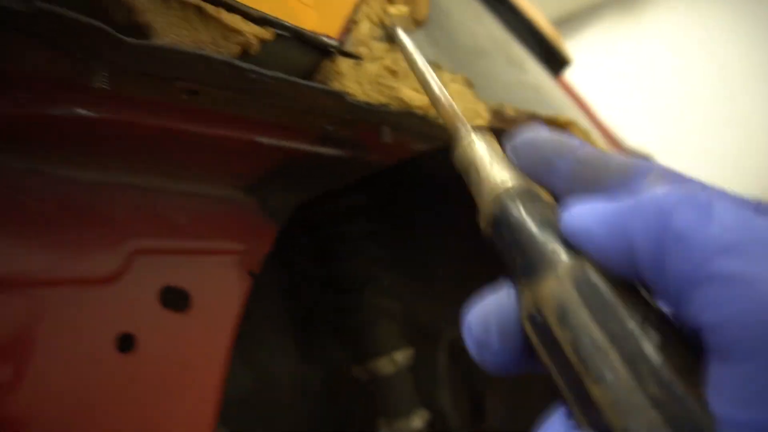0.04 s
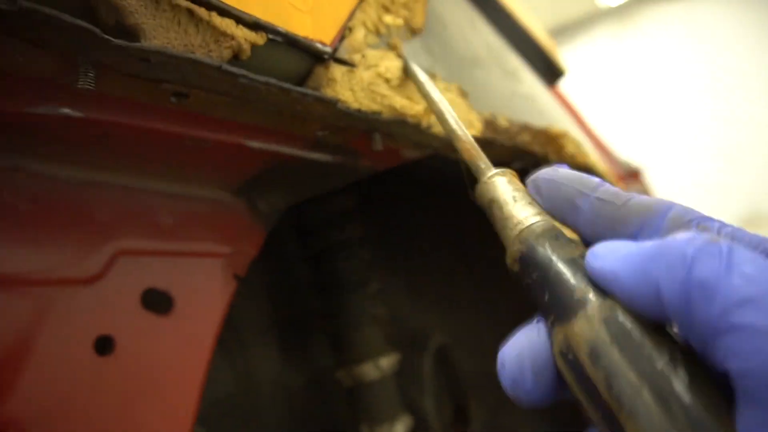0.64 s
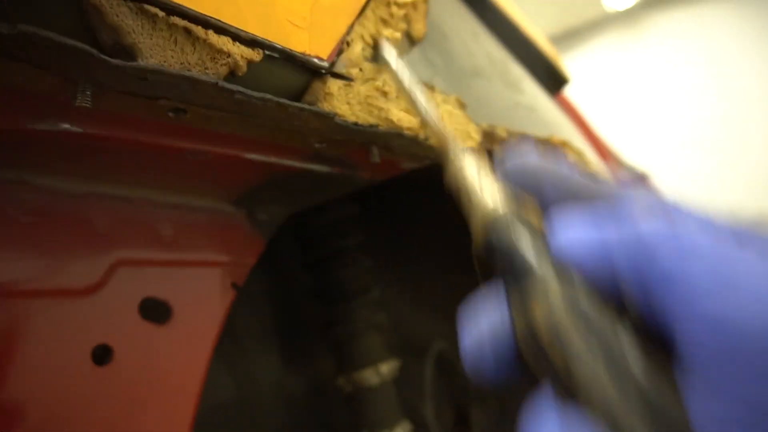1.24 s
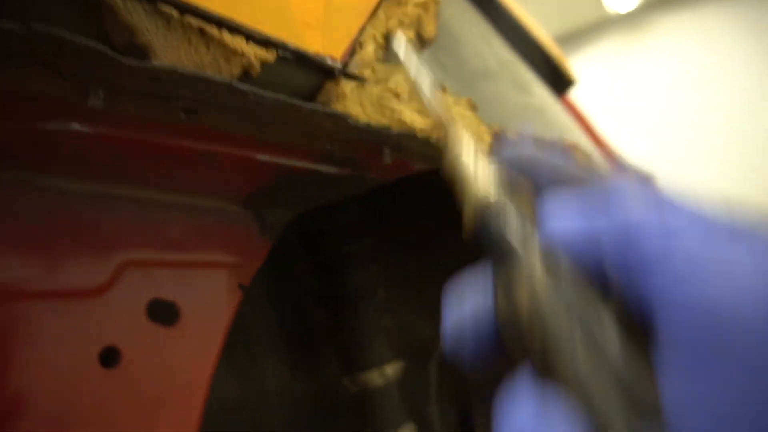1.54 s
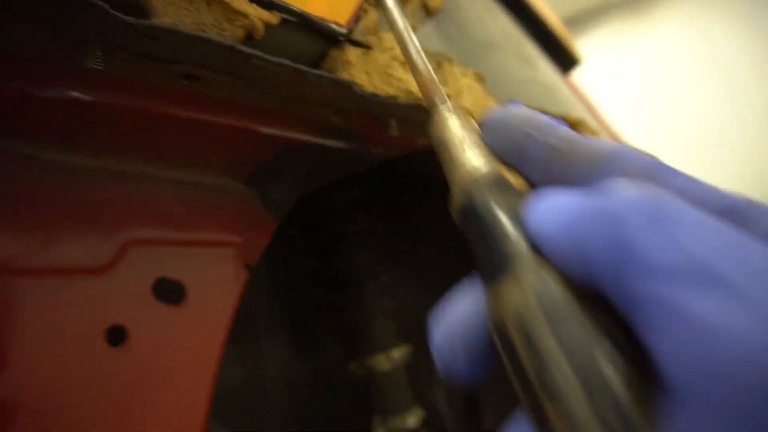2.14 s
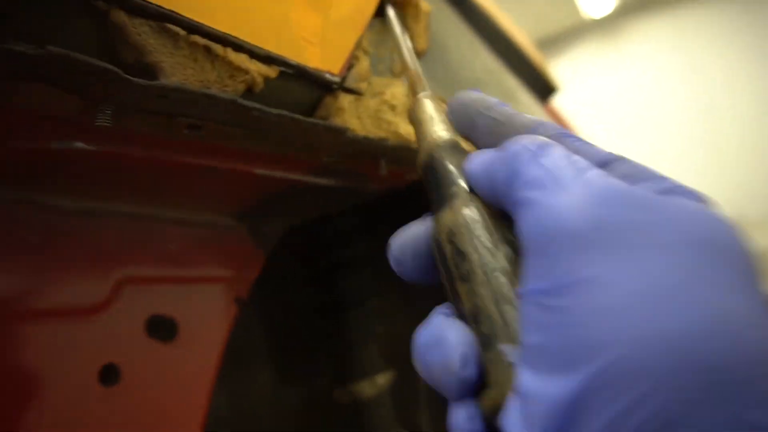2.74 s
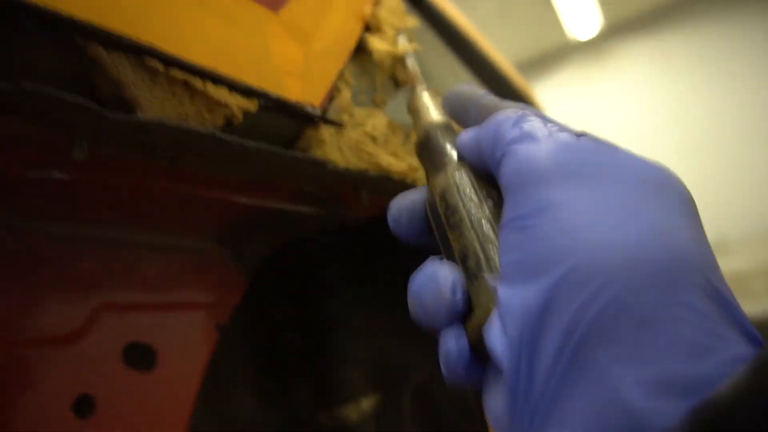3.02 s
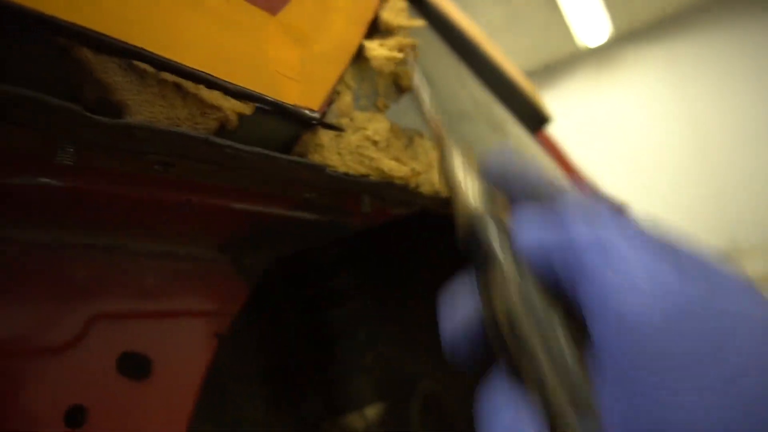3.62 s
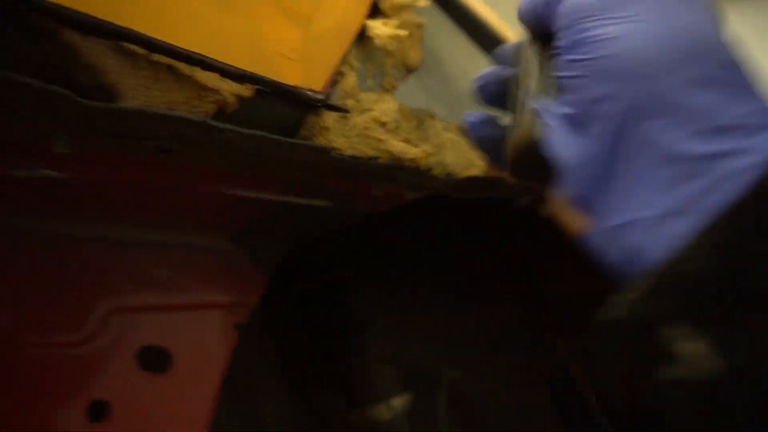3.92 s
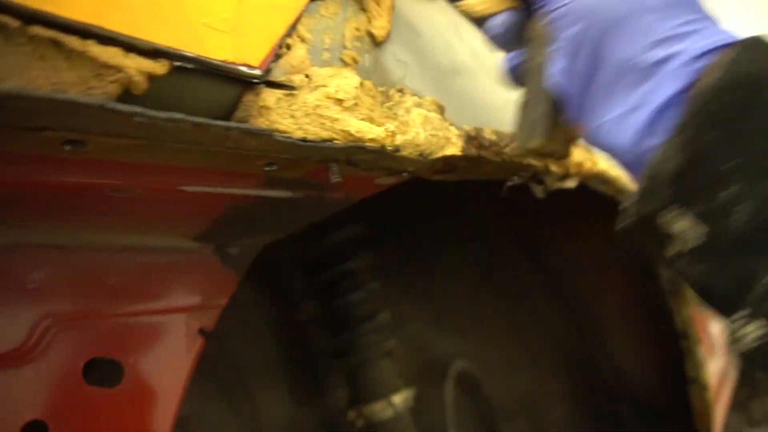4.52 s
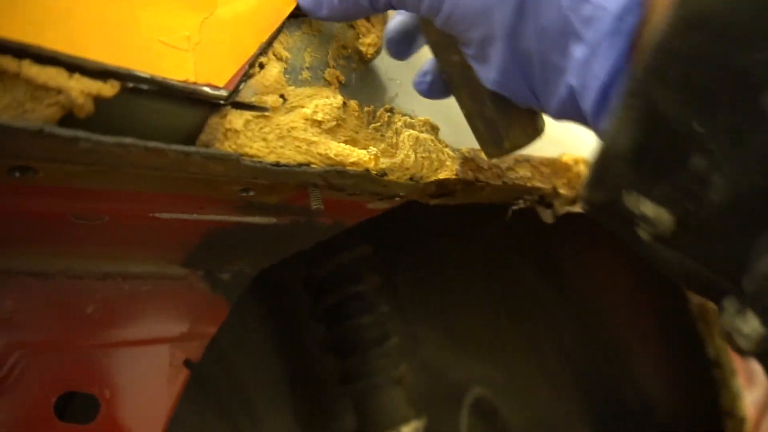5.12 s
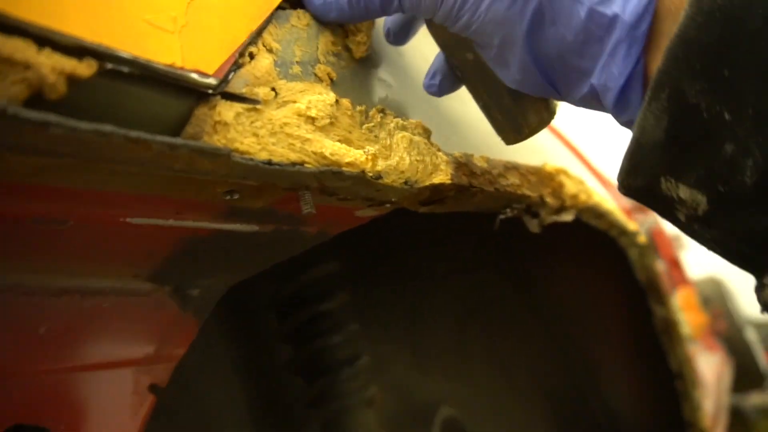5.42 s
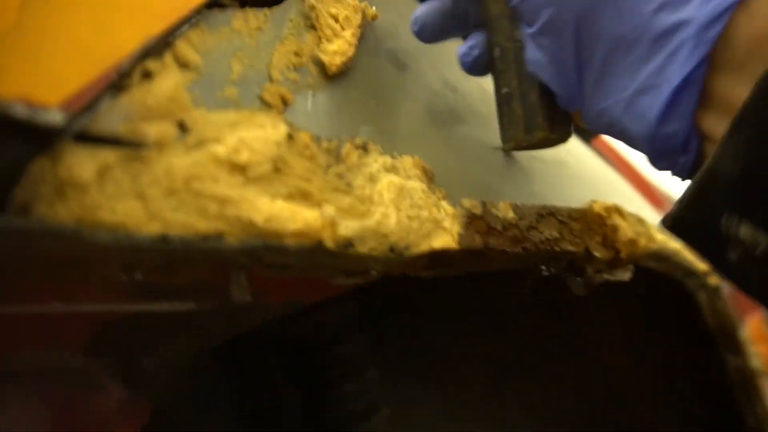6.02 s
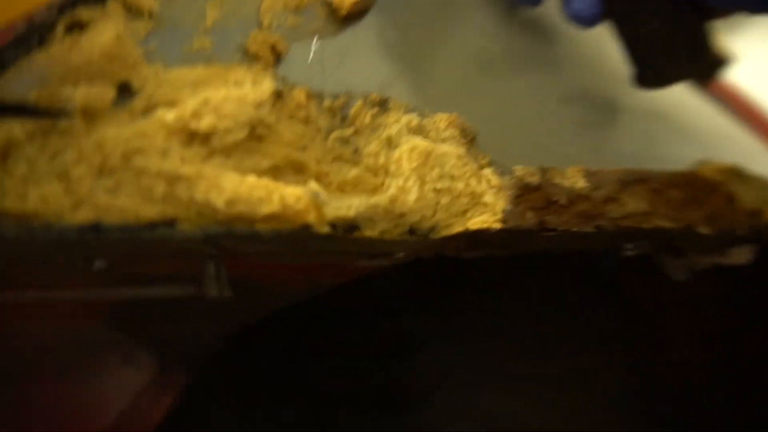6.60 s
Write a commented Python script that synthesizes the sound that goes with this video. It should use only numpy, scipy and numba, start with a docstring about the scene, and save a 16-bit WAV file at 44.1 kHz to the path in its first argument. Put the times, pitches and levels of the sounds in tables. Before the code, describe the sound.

Quick, gritty scrapes of a screwdriver on brittle insulation set a metal car panel drumming, with sharp little cracks and a few thin squeaks on bare metal. A little past halfway the strokes give way to soft, scattered rubbing, glove crinkles and blunt bumps on the panel. The sound is close, with a faint garage echo and low handling rumble on the microphone.

```python
"""Scraping insulation off a car body.

A screwdriver scrapes crumbly insulation off sheet metal, close to a hand-held camera in a garage.
The blade sticks and slips: the panel drums, the blade rasps, crumbs crackle, and now and then the tip
snaps free or squeals on bare metal. Then a gloved hand picks off loose pieces, with a few dull knocks.
The moving camera rumbles throughout."""
import sys
import numpy as np
from scipy import signal
from scipy.fft import rfft, irfft
from scipy.io import wavfile
from scipy.ndimage import uniform_filter1d, map_coordinates
from numba import njit

SR = 44100
rng = np.random.default_rng(int(sys.argv[2]) if len(sys.argv) > 2 else 0)


def write(x):
    x = np.atleast_2d(x).T
    wavfile.write(sys.argv[1], SR, np.round(np.clip(x, -1, 1) * 32767).astype(np.int16))


N = 298116
TIME = np.arange(N) / SR


def undb(db):
    """Decibels to gain."""
    return 10 ** (np.asarray(db) / 20)


def unit(x):
    """Scale to rms 1."""
    return x / np.sqrt(np.mean(x ** 2))


def steady(x, span_s):
    """Hold the rms near 1 over span_s, keeping the finer grain."""
    size = max(int(span_s * SR), 8)
    power = uniform_filter1d(uniform_filter1d(x ** 2, size), size)
    return x / np.sqrt(np.abs(power) + 1e-6 * np.mean(x ** 2))


def band(x, lo_hz, hi_hz, order=3):
    """Butterworth band-pass."""
    return signal.sosfilt(signal.butter(order, [lo_hz, hi_hz], "band", fs=SR, output="sos"), x)


def ring(x, response):
    """Play x through an impulse response."""
    return signal.fftconvolve(x, response)[:len(x)]


def colour(x, spectrum, size=2048):
    """Minimum-phase filter from rows of freq_hz, gain_db."""
    hz, db = np.transpose(spectrum)
    bins_hz = np.fft.rfftfreq(size, 1 / SR)
    log_gain = np.log(undb(np.interp(np.log(bins_hz + 1), np.log(hz), db)))
    cepstrum = irfft(log_gain)
    cepstrum[1:size // 2] *= 2
    cepstrum[size // 2 + 1:] = 0
    return ring(x, irfft(np.exp(rfft(cepstrum))))


@njit
def resonance(x, hz, damping):
    """State-variable band-pass with a moving centre."""
    out, band_state, low_state = np.empty(len(x)), 0., 0.
    for i in range(len(x)):
        g = np.tan(np.pi * hz[i] / SR)
        passed = (band_state + g * (x[i] - low_state)) / (1 + g * (g + damping))
        band_state = 2 * passed - band_state
        low_state += 2 * g * passed
        out[i] = damping * passed
    return out


def wander(per_s):
    """Smooth random drift, spread near 1."""
    size = int(SR / per_s)
    held = np.repeat(rng.standard_normal(N // size + 1), size)[:N]
    return 1.37 * uniform_filter1d(uniform_filter1d(held, size), size)


def delayed(x, lag_s):
    """Read x through a moving delay."""
    return map_coordinates(x, [np.arange(N) - lag_s * SR], order=3, mode="reflect")


def taps(start_s, level_db):
    """One impulse per event."""
    out = np.zeros(N)
    np.add.at(out, (start_s * SR).astype(int), undb(level_db))
    return out


def fractures(per_s, spread_db):
    """Tiny breaks at random moments, most small, a few large."""
    size = undb(spread_db * np.minimum(rng.exponential(size=N), 4))
    return (rng.random(N) < per_s / SR) * size * rng.choice([-1, 1], N)


def spray(breaks, t60_s):
    """Each break scatters a short burst of dust: decaying noise."""
    fade = np.exp(-2 * np.log(1000) * TIME[:SR // 4] / t60_s)
    power = ring(breaks ** 2, fade / fade.sum())
    return np.sqrt(np.abs(power)) * rng.standard_normal(N)


def crunch(per_s, low_hz, high_hz, q, spread_db):
    """Brittle bits, each ringing briefly at its own pitch."""
    out, t = np.zeros(N + 2048), TIME[:2048]
    for when, pitch, chance in rng.random((int(per_s * N / SR), 3)):
        hz = low_hz * (high_hz / low_hz) ** pitch
        size = undb(-spread_db * np.log(max(chance, .03)))
        out[int(when * N):][:len(t)] += size * np.sin(2 * np.pi * hz * t) * np.exp(-np.pi * hz * t / q)
    return unit(out[:N])


def contacts(timing, levels_db, lead_db, swell_db, release_db_per_s, linger_db, fade_db_per_s):
    """Gain of a run of contacts: each leads in, follows the pressure, releases and lingers faintly."""
    power = np.zeros(N)
    for (start, rise, fall), db in zip(timing, levels_db):
        span = slice(max(int(start * SR) - SR // 10, 0), int(start * SR) + SR)
        t = TIME[span] - start
        slack = np.interp(t, [0, rise, rise + fall], [1, 0, 1])
        early, past_peak, released = np.maximum([-t, t - rise, t - rise - fall], 0)
        pressed = undb(-lead_db * early / rise - swell_db * slack ** 2 - release_db_per_s * released)
        lingering = undb(linger_db - fade_db_per_s * past_peak) * np.clip(t / rise, 0, 1)
        power[span] += (undb(db) * np.maximum(pressed, lingering)) ** 2
    return np.sqrt(power)


# camera movement: time_s, level_db
CAMERA_MOVES = [(0.0, -15), (0.19, -29), (0.24, -13), (0.34, -32), (0.58, -25.5), (1.39, -31), (1.51, -33),
                (1.56, -31), (2.26, -18), (3.18, -33.5), (3.88, -26), (3.95, -32), (4.99, -40.5),
                (5.82, -26), (6.06, -17.5), (6.25, -31), (6.7, -19), (6.76, -28)]
# handling noise: freq_hz, gain_db
RUMBLE_SPECTRUM = [(5, -10), (14, 4.5), (25, -4), (45, -16.5), (70, -23), (100, -28.5), (140, -25.5),
                   (250, -49), (600, -91.5)]


def camera_rumble():
    """The camera rumbles as it moves in the hand."""
    time_s, level_db = np.transpose(CAMERA_MOVES)
    noise = colour(rng.standard_normal(N), RUMBLE_SPECTRUM, size=16384)
    rumble = steady(band(noise, 6.1, 600, order=2), span_s=0.12)
    return undb(np.interp(TIME, time_s, level_db)) * rumble


# room tone: freq_hz, gain_db
AIR_SPECTRUM = [(60, 2), (130, 0), (300, -5), (600, -10), (1100, -15), (2500, -20), (6400, -24),
                (10000, -27), (16000, -32)]


def garage_air():
    """Still air: steady, dark noise."""
    return unit(colour(rng.standard_normal(N), AIR_SPECTRUM))


# sheet-metal modes: freq_hz, level_db, t60_s
PANEL_MODES = [(116.7, -13.5, 0.16), (160.8, -8, 0.38), (188.5, -9, 0.46), (246.7, 5, 0.19),
               (261, 0.5, 0.36), (283.35, 4, 0.35), (324.5, -8.5, 0.3), (365.2, -8.5, 0.25),
               (438, -17, 0.11), (497, -36, 0.055), (593, -10.5, 0.52), (623, -18.5, 0.76),
               (665, -4.5, 0.24), (727, -13.5, 0.75), (767, 2.5, 0.056), (772.5, -5.5, 0.13),
               (857, -17.5, 0.17), (880, -8, 0.067), (975, -13, 0.039), (1035, -13.5, 0.23),
               (1140, -19.5, 0.045), (1286, -9, 0.092), (1430, -17, 0.18), (1549, -12, 0.37),
               (1654, -9, .1), (1876, -17, 0.39), (2273, -4, .08), (2470, -8, 0.17), (2800, -6.5, 0.16),
               (3080, -5, 0.055), (3520, -22.5, .06)]


def panel_response():
    """The panel's ring after one tap, unit energy."""
    t = TIME[:SR // 2]
    modes = sum((-1) ** k * undb(db) * np.sin(2 * np.pi * hz * t) * np.exp(-np.log(1000) * t / t60_s)
                for k, (hz, db, t60_s) in enumerate(PANEL_MODES))
    return modes / np.linalg.norm(modes)


def drumming(metal, slips):
    """The panel's low modes plus the dead thud of the blade pressing on it."""
    lean_db = 3 * wander(per_s=14)  # the moving tip favours lower or higher modes
    lower = undb(lean_db + 1) * unit(band(metal, 131.8, 259.2, order=5))
    higher = undb(-lean_db) * unit(band(metal, 270.5, 428, order=5))
    thud = undb(-5.5) * unit(band(slips, 147, 376, order=2))
    deep_thud = undb(-16) * unit(band(slips, 80, 150, order=2))
    return lower + higher + thud + deep_thud


# blade on insulation: freq_hz, gain_db
GRIND_SPECTRUM = [(400, 3), (520, 4), (650, -6), (900, -1), (1300, -1.5), (1600, -2.5), (2100, -8.5),
                  (2800, -11.5), (3800, -12), (6000, -27.5)]


def grinding(metal, slips):
    """Noise at the tip: slips, ringing metal and crushed bits."""
    bits = crunch(per_s=240, low_hz=695.3, high_hz=4864, q=46, spread_db=2)
    ringing = unit(band(metal, 460, 2730, order=2))
    return colour(unit(slips) + undb(-4.5) * ringing + undb(-7) * bits, GRIND_SPECTRUM)


def rasping(grind, timing, centres_hz, slowing_per_s=7.6):
    """The rasp is brightest as the blade bites and sinks up to an octave as it slows."""
    hz = np.full(N, centres_hz[0])
    for (start, rise, _), centre_hz in zip(timing, centres_hz):
        first = int(start * SR)
        hz[first:] = centre_hz * np.clip(1 - slowing_per_s * (TIME[first:] - start - rise), 0.5, 1)
    rasp = band(grind, 402, 2850, order=4)
    return resonance(rasp, uniform_filter1d(hz, size=400), damping=0.94) + undb(-26) * rasp


# breaking crumbs: freq_hz, gain_db
CRUMB_SPECTRUM = [(3000, -6.5), (5000, -1.5), (6300, -1), (7100, -4.5), (8000, -1), (8700, 2.5), (9400, -3),
                  (10100, -8.5), (12000, -10), (12700, -12.5), (13600, -9.5), (16000, -23.5)]


def crackling(slips, bite_gain):
    """Crumbs, dust and chips break off; a harder bite makes finer dust, which hisses higher."""
    crumbs = unit(slips) + undb(3) * unit(fractures(per_s=600, spread_db=10))
    chips = crunch(per_s=360, low_hz=4824, high_hz=14160, q=85, spread_db=2.5)
    dust = undb(7.5) * spray(crumbs, t60_s=0.06)
    debris = band(colour(crumbs + dust + chips, CRUMB_SPECTRUM), 3500, 22000, order=4)
    bite_db = 20 * np.log10(bite_gain + 1e-9)
    hiss_db = np.clip(0.087 * (bite_db + 54), -8, 5)
    return band(debris, 2960, 9030, order=4) + undb(hiss_db) * band(debris, 11100, 22000, order=4)


# blade strokes: start_s, rise_s, fall_s, rasp_db, drum_db, centre_hz, grit_db, crackle_db
BLADE_STROKES = [ (0.002, 0.034, .03, -13.5, -12, 900, -25, -33.5),
                 (0.068, .014, 0.04, -20, -12.5, 776, -53, -46),
                 (0.121, 0.039, 0.031, -15.5, -18, 1200, -14.5, -19.5),
                 (0.185, 0.014, 0.033, -12, -16, 770, -24.5, -48),
                 (0.291, 0.018, 0.044, -10.5, -12, 920, -26, -37.5),
                 (0.355, 0.011, 0.02, -28, -8, 900, -31, -49.5),
                 (0.407, .024, 0.0062, -16.5, -18, 1050, -14.5, -24),
                 (0.438, 0.0098, 0.1, -12.5, -9.5, 850, -35, -37),
                 (0.583, 0.023, 0.1, -20.5, -8.5, 800, -33.5, -39),
                 (0.71, 0.031, 0.037, -21.5, -16.5, 1700, -18, -21),
                 (0.763, 0.016, 0.013, -14, -15.5, 900, -28, -36),
                 (0.875, 0.015, 0.059, -16.5, -9.5, 950, -25, -39),
                 (0.977, 0.055, 0.005, -17, -13.5, 1150, -17, -24),
                 (1.04, 0.039, 0.031, -14.5, -10.5, 900, -34.5, -71),
                 (1.131, 0.016, 0.084, -18, -19, 1050, -31.5, -39),
                 (1.214, 0.011, 0.021, -16.5, -9, 1050, -19, -35),
                 (1.271, 0.0077, 0.043, -17.5, -17.5, 1100, -28.5, -31),
                 (1.318, 0.018, 0.053, -13.5, -13.5, 1000, -19.5, -28.5),
                 (1.426, 0.021, 0.022, -17, -18, 860, -31, -36),
                 (1.478, 0.015, 0.044, -16, -14, 1050, -21.5, -30),
                 (1.567, 0.062, 0.017, -15.5, -15.5, 850, -21.5, -28.5),
                 (1.697, 0.014, 0.058, -20.5, -18, 930, -33, -38.5),
                 (1.765, 0.041, .015, -39, -14.5, 780, -47, -50),
                 (1.811, 0.0077, 0.052, -21.5, -33, 700, -28.5, -35),
                 (1.954, 0.04, 0.0046, -32, -27, 900, -36, -40.5),
                 (2.05, 0.015, 0.029, -26, -20, 760, -35, -37.5),
                 (2.075, .016, 0.02, -22.5, -22.5, 800, -29.5, -34.5),
                 (2.176, 0.049, 0.01, -33.5, -36, 740, -36.5, -38),
                 (2.28, 0.026, .006, -26.5, -17, 760, -31, -33.5),
                 (2.303, 0.0032, 0.036, -13.5, -20.5, 770, -20.5, -26),
                 (2.387, 0.037, 0.027, -20.5, -22, 840, -29, -37),
                 (2.494, 0.02, 0.019, -17, -22.5, 1050, -27.5, -33.5),
                 (2.528, 0.019, 0.0084, -21.5, -17, 750, -30, -37),
                 (2.618, 0.019, 0.059, -22.5, -19, 1030, -32.5, -45.5),
                 (2.722, 0.034, 0.038, -15, -13.5, 850, -23, -32.5),
                 (2.866, .007, 0.06, -18.5, -15, 900, -25.5, -36),
                 (2.96, 0.027, 0.048, -13.5, -15.5, 1100, -21, -34),
                 (3.03, 0.0071, 0.04, -18.5, -14, 860, -49, -48),
                 (3.11, 0.02, 0.058, -12.5, -14.5, 980, -22.5, -35.5),
                 (3.224, 0.025, 0.026, -15.5, -21.5, 760, -20.5, -32.5),
                 (3.259, 0.017, 0.033, -11.5, -15, 770, -27.5, -48),
                 (3.385, 0.031, 0.03, -15, -13.5, 900, -29, -38),
                 (3.48, 0.042, 0.015, -17.5, -19.5, 1400, -20, -29),
                 (3.521, 0.0074, 0.022, -13.5, -20.5, 860, -21.5, -27),
                 (3.623, 0.0044, 0.0075, -29.5, -9.5, 780, -42, -53.5),
                 (3.654, 0.0088, 0.016, -35, -26, 700, -42, -49),
                 (3.714, 0.0054, 0.0095, -23.5, -12, 1100, -29, -41),
                 (3.778, 0.0054, 0.02, -19.5, -14.5, 870, -32, -41),
                 (3.798, 0.011, 0.028, -16, -12.5, 840, -28.5, -40),
                 (3.861, .006, .015, -47, -28, 660, -51, -66), ]


def scraping(panel):
    """The blade sticks and slips, shaking the panel and grinding the insulation."""
    timing, settings = np.hsplit(np.array(BLADE_STROKES), [3])
    rasp_db, drum_db, centre_hz, grit_db, crackle_db = settings.T
    drum_gain = contacts(timing, drum_db, lead_db=26, swell_db=3,
                         release_db_per_s=156.5, linger_db=-18, fade_db_per_s=91)
    rasp_gain = contacts(timing, rasp_db, lead_db=22.5, swell_db=5.5,
                         release_db_per_s=253.5, linger_db=-9, fade_db_per_s=106.5)
    grit_gain = contacts(timing, grit_db, lead_db=28, swell_db=13.5,
                         release_db_per_s=499.5, linger_db=-16, fade_db_per_s=108.5)
    crackle_gain = contacts(timing, crackle_db, lead_db=25.5, swell_db=11,
                            release_db_per_s=705, linger_db=-13.5, fade_db_per_s=76.5)
    slips = fractures(per_s=1300, spread_db=4)
    # changing pressure bends the sheet, so its modes waver
    metal = delayed(ring(slips, panel), lag_s=.0007 * wander(per_s=16))
    drum = drumming(metal, slips)
    grind = grinding(metal, slips)
    rasp = rasping(grind, timing, centre_hz)
    grit = band(grind, 1930, 5000, order=4)
    crackle = crackling(slips, crackle_gain)
    # the reflection off the sheet shifts with blade angle and combs the treble
    reflection_s = 0.000397 * undb(2 * wander(per_s=9))
    grit, crackle = (x + 0.23 * delayed(x, reflection_s) for x in (grit, crackle))
    return (drum_gain * steady(drum, span_s=0.033)
            + rasp_gain * steady(rasp, span_s=0.039)
            + grit_gain * steady(grit, span_s=0.01)
            + crackle_gain * steady(crackle, span_s=0.028))


# snaps, relative levels: start_s, crack_db, bite_db
TIP_SNAPS = [(0.045, -20.5, -7), (0.0693, -14, -8), (0.3497, -24, -10.5), (0.378, -21, -17),
             (0.4064, -14, -8), (0.4264, -22, -21), (0.6558, -9, -3), (0.6598, -12, -8.5),
             (0.7095, -18, -8.5), (0.8835, -12, -13.5), (0.9172, -6, -5), (1.018, -10, -6.5),
             (1.049, -19, -39.5), (1.22, -7.5, 0.5), (1.229, -9, -21.5), (1.2696, -19, -3), (1.479, 0, -3),
             (1.5705, -10, -14), (1.708, -15, -12.5), (1.9826, -19, -22), (2.0929, -10, -16),
             (2.306, -6, -15.5), (2.4192, -10.5, -29), (3.0055, -13, -31), (3.243, -29, -24),
             (3.4108, -15, -25), (3.7187, -25, -12), (3.862, -13, -12), (4.2632, -31, -39),
             (4.4114, -35, -33), (4.475, -24, -30), (5.1668, -33, -37), (5.9307, -18, -23),
             (5.962, -19, -22), (5.9835, -14, -20), (6.541, -32, -31.5), (6.578, -33, -46)]


def snaps():
    """The tip snaps free or a crumb breaks: a sharp crack, a spray of crumbs and a dull bite."""
    start_s, crack_db, bite_db = np.transpose(TIP_SNAPS)
    crack, bite = taps(start_s, crack_db), taps(start_s, bite_db)
    crack += undb(2) * spray(crack, t60_s=0.011)
    crack = band(colour(crack, CRUMB_SPECTRUM), 1600, 20000, order=2)
    bite = band(bite + undb(6.5) * spray(bite, t60_s=0.044), 640, 2870, order=2)
    return undb(11) * crack + undb(18) * bite


# blade on bare metal: peak_s, pitch_hz, half_length_s, level_db
METAL_SQUEALS = [(0.132, 3180, 0.022, -16.5), (0.745, 2680, 0.057, -18.5), (1.29, 3010, 0.059, -21),
                 (1.577, 3030, 0.04, -23.5), (2.506, 2830, 0.023, -21.5), (6.15, 2100, 0.04, -39)]


def squeals():
    """Brief, rough screeches: narrow-band friction noise swells and fades."""
    out = np.zeros(N)
    for peak_s, pitch_hz, half_length_s, level_db in METAL_SQUEALS:
        progress = np.clip((TIME - peak_s) / half_length_s, -1, 1)
        tone = band(rng.standard_normal(N), .92 * pitch_hz, 1.08 * pitch_hz, order=2)
        out += undb(level_db) * steady(tone, span_s=0.028) * np.cos(np.pi * progress / 2) ** 4
    return out


# finger contacts: start_s, rise_s, fall_s, rub_db, body_db, crinkle_db
FINGER_PICKS = [ (3.9, 0.086, 0.059, -63, -58, -44.5), (4.085, 0.012, 0.0067, -57, -63, -47),
                (4.16, 0.039, 0.017, -47.5, -54, -50), (4.235, 0.033, .035, -51.5, -51, -57),
                (4.35, 0.0089, 0.011, -43, -40, -45), (4.475, 0.032, 0.0098, -36.5, -46, -45),
                (4.505, .008, .02, -22, -26, -45), (4.683, 0.015, 0.0074, -64, -53, -49),
                (5.16, 0.0069, 0.028, -51, -64, -56), (5.217, 0.015, .008, -48, -51, -44),
                (5.28, 0.018, 0.016, -45, -49, -54), (5.372, .025, .065, -46, -45, -49),
                (5.895, 0.009, 0.02, -24.5, -42, -39.5), (5.955, 0.029, 0.014, -30, -32, -37),
                (6.102, 0.051, 0.023, -34.5, -35.5, -45.5), (6.295, 0.02, .01, -49, -64, -47),
                (6.35, .014, .02, -55, -53, -48), (6.42, 0.006, 0.011, -45, -51, -52),
                (6.5, 0.042, 0.023, -43.5, -45, -52), (6.599, 0.033, 0.025, -45.5, -43.5, -48.5),
                (6.655, 0.16, .06, -51, -55, -47), ]
# loose pieces on metal: freq_hz, gain_db
RUB_SPECTRUM = [(400, -10.5), (580, -4.5), (750, -12), (1000, -16.5), (1500, -20), (2200, -27.5),
                (4000, -23)]
# glove and crumbs: freq_hz, gain_db
CRINKLE_SPECTRUM = [(1180, -19), (2000, -4), (2910, -10.5), (3280, -7), (7380, -10), (8700, -7.5),
                    (10500, -15), (14400, -14), (16000, -33)]


def picking(panel):
    """Loose pieces rub on the metal and stir the panel; glove and crumbs crinkle."""
    timing, levels = np.hsplit(np.array(FINGER_PICKS), [3])
    rub_db, body_db, crinkle_db = levels.T
    rub_gain = contacts(timing, rub_db, lead_db=16, swell_db=-0.5,
                        release_db_per_s=294, linger_db=-24.5, fade_db_per_s=90)
    body_gain = contacts(timing, body_db, lead_db=29, swell_db=-2.5,
                         release_db_per_s=215, linger_db=-7, fade_db_per_s=80)
    crinkle_gain = contacts(timing, crinkle_db, lead_db=21, swell_db=1,
                            release_db_per_s=600, linger_db=-14.5, fade_db_per_s=71.5)
    breaks = fractures(per_s=1400, spread_db=4.8)
    breaks += undb(0.5) * spray(breaks, t60_s=0.094)
    metal = ring(breaks, panel)
    rub = band(colour(breaks + undb(-35) * metal, RUB_SPECTRUM), 433, 2870)
    body = unit(band(metal, 168, 384)) + undb(8.5) * unit(band(breaks, 113, 350, order=2))
    crinkle = band(colour(breaks, CRINKLE_SPECTRUM), 2220, 19000)
    return (rub_gain * steady(rub, span_s=0.0071)
            + body_gain * steady(body, span_s=0.018)
            + crinkle_gain * steady(crinkle, span_s=0.047))


# knocks, relative levels: start_s, boom_db, clank_db
PANEL_KNOCKS = [(4.364, -20, -57), (4.502, -20, -26.5), (5.172, -31.5, -60), (5.891, -17, -54),
                (6.503, -22.5, -37), (6.603, -28, -46)]


def knocks(panel):
    """Blunt blows on the panel: a low boom and a short clank."""
    start_s, boom_db, clank_db = np.transpose(PANEL_KNOCKS)
    push, blow = taps(start_s, boom_db), taps(start_s, clank_db)
    boom = band(ring(push, panel) + undb(27) * spray(push, t60_s=0.17), 136, 300, order=2)
    clank = band(spray(blow, t60_s=0.051) + undb(-14) * ring(blow, panel), 350, 960, order=2)
    return undb(16) * boom + undb(39) * clank


def garage_echo(x, t60_s):
    """The walls return a dense, dull decay."""
    tail = rng.standard_normal(SR) * np.exp(-np.log(1000) * TIME[:SR] / t60_s)
    return band(ring(x, tail / np.linalg.norm(tail)), 140, 2600, order=1)


def scene():
    """Work on the panel and its faint echo, over camera rumble and garage air; mono."""
    panel = panel_response()
    work = scraping(panel) + squeals() + picking(panel) + snaps() + knocks(panel)
    echo = undb(-14) * garage_echo(work, t60_s=0.83)
    return (work + echo + camera_rumble() + undb(-53) * garage_air())[None]


def record(dry):
    """Soft clip at full scale, then a steep low-pass."""
    top_hz = 16000
    rounded = dry / (1 + dry ** 8) ** (1 / 8)
    return signal.sosfilt(signal.ellip(10, .2, 70, top_hz, fs=SR, output="sos"), rounded)


dry = scene()
out = record(dry)
write(out)
```